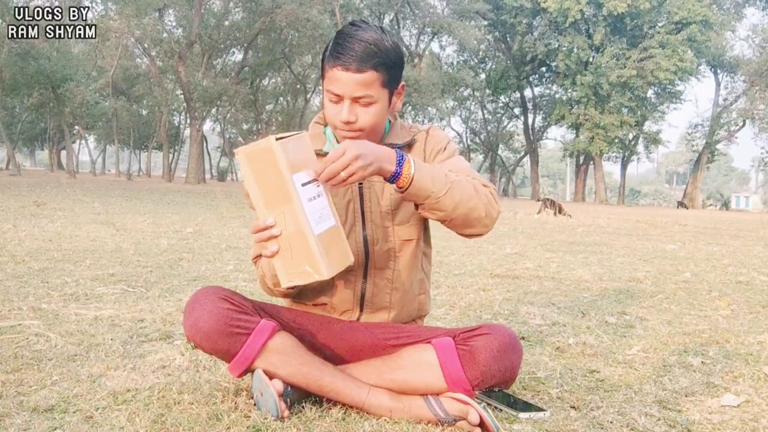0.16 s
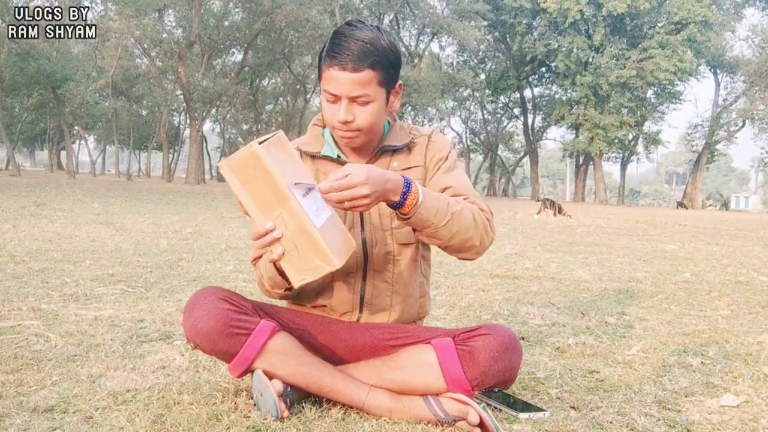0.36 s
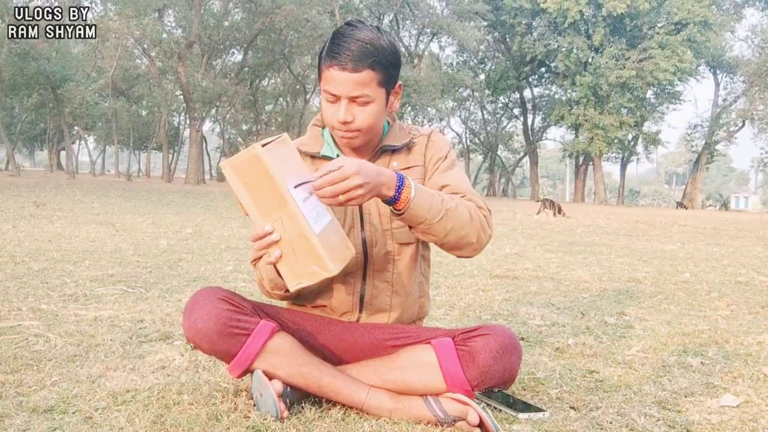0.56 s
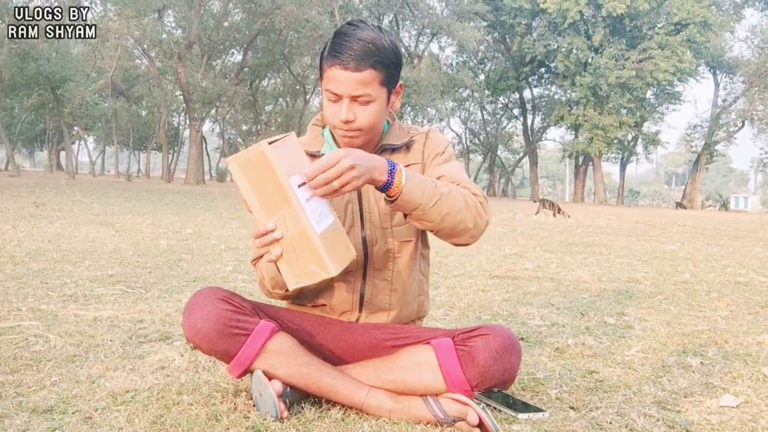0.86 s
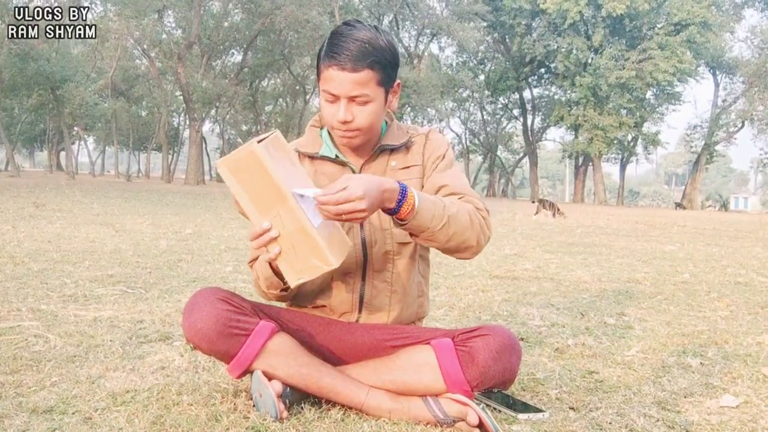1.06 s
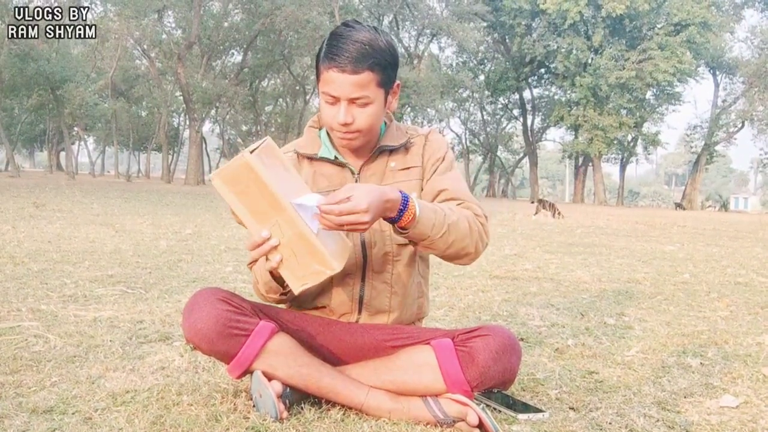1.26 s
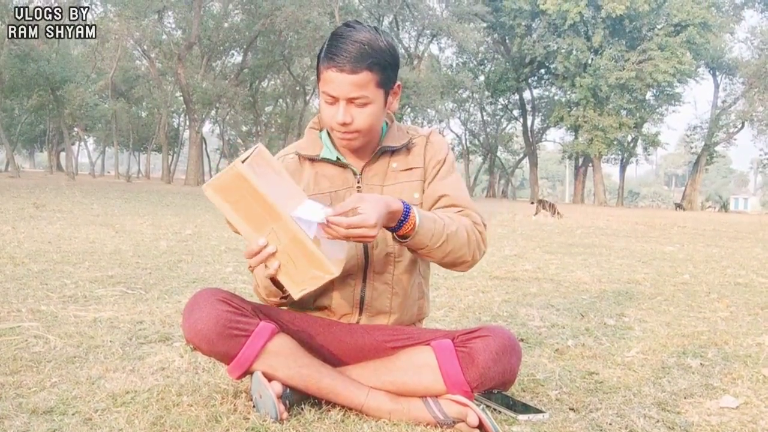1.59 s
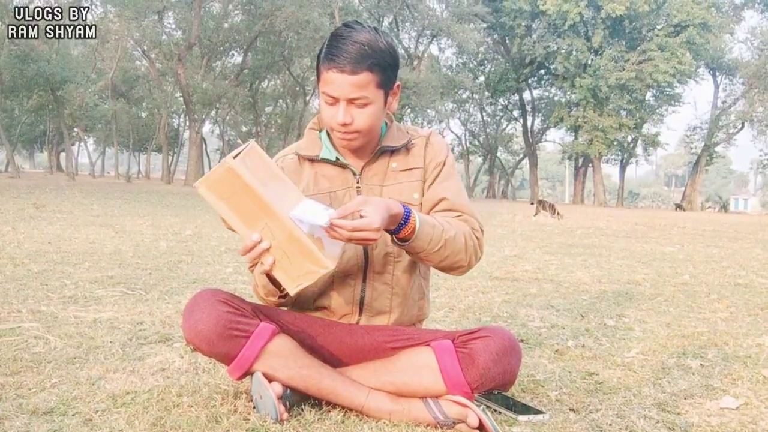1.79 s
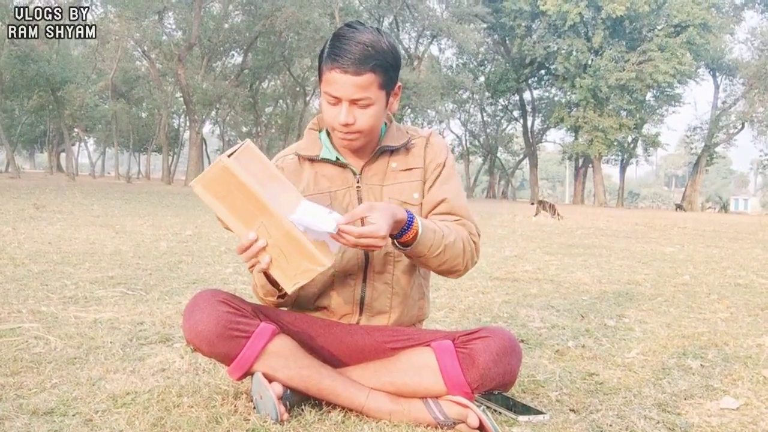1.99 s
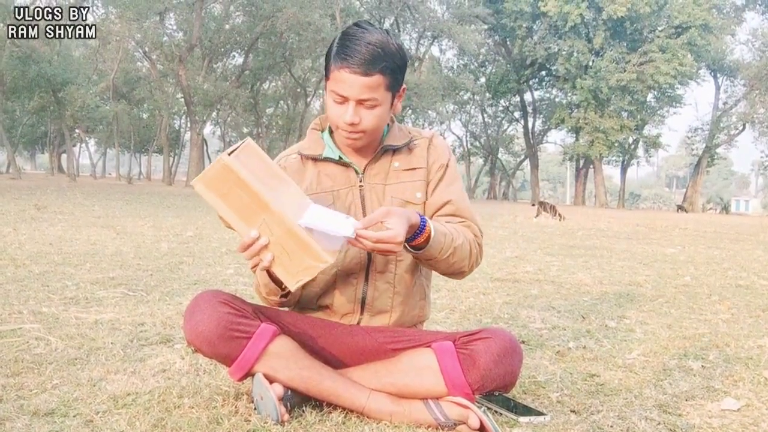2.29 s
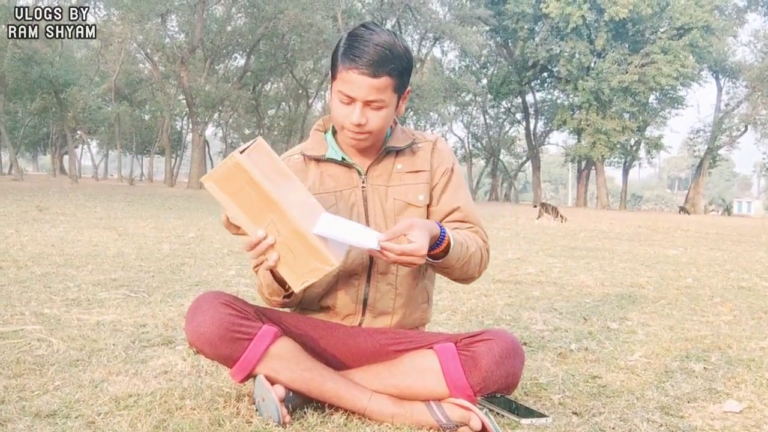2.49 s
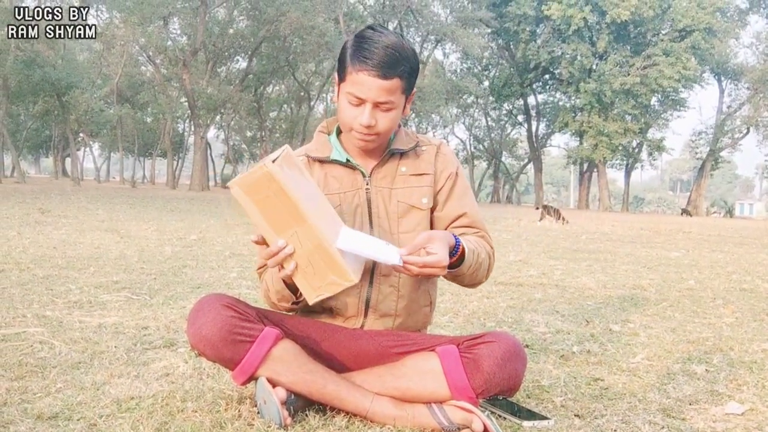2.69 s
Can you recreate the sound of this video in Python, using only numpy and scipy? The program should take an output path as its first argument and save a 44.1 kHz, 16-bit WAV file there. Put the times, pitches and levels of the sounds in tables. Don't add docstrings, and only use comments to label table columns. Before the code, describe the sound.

A sticky label peels off a hollow cardboard box: a loud fast rip first, then sparse slow crackles, then two quick rips and a slap, close in stereo outdoors over a faint low hum.

```python
import sys
import numpy as np
from scipy import signal
from scipy.fft import rfft, irfft, next_fast_len
from scipy.io import wavfile
from scipy.ndimage import uniform_filter1d, minimum_filter1d, map_coordinates

SR = 44100
rng = np.random.default_rng(int(sys.argv[2]) if len(sys.argv) > 2 else 0)


def makeup_ratio(level_db):
    decades = np.asarray(level_db, float) / 20
    return 10 ** decades


def output_pcm(signal):
    pcm = np.clip(np.atleast_2d(signal).T, -1, 1) * 32767
    wavfile.write(sys.argv[1], SR, np.round(pcm).astype(np.int16))


N = 125685

# (frequency [Hz], density [dB per Hz])
AIR_TONE = [(53, -16), (90, 2.5), (188, -6), (265, -9), (674, -14.5), (807, -17), (1600, -18),
            (2620, -14.5), (4500, -28.5), (5850, -53), (9900, -120)]
# (frequency [Hz], density [dB per Hz])
RUMBLE_TONE = [(28, -9), (40, 2), (60, -19), (80, -3.5), (100, -24)]
# (frequency [Hz], density [dB per Hz])
PORT_TONE = [(2650, -8.5), (4500, -5), (5700, 4), (6090, -5), (7640, 4.5), (9160, -11), (13000, -13),
             (14500, -11), (15000, -36)]
# (frequency [Hz], correlation [0-1])
AIR_ALIKE = [(60, 1), (130, 0.76), (500, 0.2), (1400, 0.033), (8000, .02)]
# (frequency [Hz], correlation [0-1])
NEAR_ALIKE = [(300, 0.92), (1200, 0.65), (3000, 0.5), (8000, 0.069)]
# (time [s], peel level [dB])
PULLS = [
    [(.233, -58), (.262, -29), (.288, -40.5), (.298, -32), (.324, -30), (.338, -41.5), (.385, -48),
     (.405, -61), (.47, -74)],
    [(.69, -54), (.72, -65.5), (.77, -64), (.8, -67), (.85, -62), (.88, -76)],
    [(1.02, -74), (1.05, -69.5), (1.08, -69.5), (1.11, -55.5), (1.16, -47), (1.2, -52.5), (1.26, -53),
     (1.28, -66), (1.33, -73)],
    [(1.48, -69), (1.52, -62), (1.57, -59.5), (1.61, -73), (1.66, -60.5), (1.72, -51), (1.755, -46),
     (1.785, -61.5), (1.832, -66)],
    [(1.826, -64), (1.86, -58.5), (1.88, -57), (1.94, -50.5), (1.96, -50.5), (2.0, -46), (2.03, -54),
     (2.07, -67)],
    [(2.085, -72), (2.135, -52.5), (2.16, -49.5), (2.18, -58), (2.24, -68.5)],
    [(2.236, -62), (2.322, -58), (2.34, -42.5), (2.365, -44), (2.4, -44), (2.42, -54.5), (2.445, -55.5),
     (2.484, -60.5)],
    [(2.48, -54), (2.525, -48), (2.54, -39), (2.56, -35.5), (2.59, -36), (2.6, -58), (2.66, -64)],
]
DRUM_DB = [-10.5, -17, 0, 0, -3, -7.5, -8, -13]
# (frequency [Hz], width [Hz], level [dB])
BOX_MODES = [(193, 37, -1), (348.6, 77.4, 1.5), (584, 87, -13), (928, 400, -8)]
# (time [s], peak [dB], body [dB])
FLAP_SNAPS = [(0.2336, -24, -12), (0.2356, -7, -17), (0.2375, -14.5, -10.5), (0.2443, -14, -1),
              (0.2544, -9, -10), (0.2594, -15, -11), (0.2609, -24, -9), (0.2633, -9, -4.5),
              (0.2649, -37, -17), (0.271, -10.5, -8), (0.281, -16, -11), (0.2842, -13, -4),
              (0.2928, -18, 6), (0.2978, -10.5, -9), (0.2997, -16, -2), (0.3027, -11, -9),
              (0.3042, -14, -8), (0.3073, -13, -14), (0.3095, -10, -11), (0.3125, -22, -11),
              (0.314, -11.5, -20), (0.3156, -24, -11), (0.3172, -13, -9), (0.3215, -8.5, -7.5),
              (0.3235, -24, -12), (0.3285, -29, -17), (0.3316, -22, -3), (0.3331, -23, -11)]
# (time [s], peak [dB], body [dB])
LABEL_SNAPS = [(0.696, -39, -14), (1.0415, -37, -16), (1.0595, -33.5, -23), (1.0798, -39, -13),
               (1.0963, -30, -6), (1.0981, -31.5, -1), (1.1133, -41, -6), (1.1409, -39, -7),
               (1.4988, -41, -10), (1.525, -30, 7.5), (1.7437, -30, -14), (1.7519, -15.5, -23),
               (1.7546, -29, -9), (1.7589, -23.5, -13), (1.7827, -35, -7), (1.8604, -53, -20),
               (1.8624, -30, -15), (1.8669, -36, -15), (1.8761, -48, -17), (1.8785, -35, -19),
               (1.908, -35, -14), (1.9644, -36, -17), (1.9659, -29, -20), (1.9849, -17, -10),
               (1.9976, -38, -11), (2.0091, -32, -16), (2.013, -33, -6), (2.046, -29, -18),
               (2.0887, -29, -10), (2.0909, -36, 0), (2.1003, -28, -10), (2.1022, -21.5, -2),
               (2.1036, -31, -13), (2.115, -20, -7), (2.1267, -35, 7.5), (2.1341, -22, -2.5),
               (2.2901, -19.5, -5), (2.2921, -29, -2), (2.309, -38, -15), (2.3107, -23, -9),
              (2.313, -35, -2), (2.324, -25, -6), (2.325, -34, -7), (2.3311, -22, -23),
              (2.3355, -15.5, -16), (2.3458, -18.5, -11), (2.352, -20, -23), (2.364, -32, -9),
              (2.3661, -12, -20), (2.3689, -18, -7), (2.379, -32, -15), (2.3794, -29, -5),
              (2.3947, -22, -10), (2.3963, -27, -16), (2.4033, -20, -16), (2.4055, -24, -22),
              (2.4106, -24, -11), (2.4123, -37, -15), (2.4243, -41, -14), (2.433, -24, -10),
              (2.441, -33, -16), (2.4848, -26, -24), (2.4854, -27, -16), (2.503, -21, -12),
              (2.504, -40, -9), (2.5161, -21, -7), (2.519, -30, -3), (2.5271, -28, -15), (2.5365, -18, -18),
              (2.539, -22, -18), (2.5421, -17, -20), (2.5494, -24, -32), (2.5558, -17, -22),
              (2.5574, -18, -16), (2.5596, -18.5, -12), (2.5634, -16, -6), (2.5682, -19, -9),
              (2.5691, -27, -13), (2.57, -35, -6), (2.584, -24, -3), (2.5857, -21, -17),
              (2.5875, -21.5, 0.5), (2.5919, -32, -14), (2.8005, -43, -10)]
# (frequency [Hz], density [dB per Hz])
FLAP_TONE = [(280, -24), (430, -7), (900, 2), (1600, -7.5), (4800, -3), (9500, -1.5), (14000, -9.5),
             (16000, -22)]
# (frequency [Hz], density [dB per Hz])
LABEL_TONE = [(400, -19), (1000, 0), (2200, -2), (3000, 1.5), (6500, 1.5), (10000, 0), (14000, -4),
              (16000, -3)]
# (frequency [Hz], gain [dB])
LEFT_PORT = [(4000, -1.5), (5200, 2.5), (6200, 7), (7000, 7.5), (7900, 12.5), (8500, 9.5), (9200, 1),
             (11000, -1.5)]
# (frequency [Hz], gain [dB])
FLAP_RIGHT = [(200, 8), (2000, -0.5)]
# (frequency [Hz], gain [dB])
LABEL_RIGHT = [(200, 6), (1500, -6.5), (4000, -10), (12000, -2)]
# (time [s], level [dB], upper rings [dB])
CLINKS = [
    (.478, -60, 0),
    (.763, -52, 0),
    (1.283, -53, 0),
    (2.152, -47, -14),
]
# (frequency [Hz], level [dB], t60 [s])
GLASS_MODES = [(5670, -11, .25), (9017, 0, .15), (9950, -6, .2), (13710, -10, .12)]
# (time [s], level [dB])
TAPS = [
    (1.301, -53),
    (1.524, -43),
    (1.838, -45),
    (2.044, -48.5),
    (2.578, -40),
    (2.587, -32.5),
]
# (frequency [Hz], density [dB per Hz])
TAP_TONE = [(300, -33), (800, 4), (1600, -1), (3200, -4), (6000, -20)]
# (frequency [Hz], gain [dB])
TREBLE_EDGE = [(14300, 0.5), (14700, -15), (16300, -19), (16600, -90)]
# (frequency [Hz], share of bands dropped [0-1])
HOLES = [(1000, 0), (2500, .07), (4000, .07), (5000, .01), (8500, .01), (9500, .16), (14000, .2)]

HUM_HZ, HUM_DRIFT_HZ, HUM_DB, HUM_SWAY_DB = 58.3, 1.2, -46, 1.1
AIR_DB, PORT_DB, RUMBLE_DB = -63.5, -63, -58
GRAINS_PER_S, GRAIN_SPREAD_DB, GRAIN_T60_S, HISS_SHARE = 700, 4, .005, .65
PEEL_DB, PULL_EDGE_S = 5, .0025
HISS_TOP_HZ = 14600
SNAP_DB, SNAP_T60_S, SNAP_RISE_S = -10, .0055, .0002
SNAP_TAIL_DB, SNAP_TAIL_T60_S = -12, .022
SPIKE_DB, RING_UP_S = 13.5, .00025
SOFT_BELOW_DB, SOFTEN = -28, .45
BODY_HZ, BODY_DB = 3250, 9
DULL_CRACK_DB, DULL_TAIL_DB = -5, 3
FLEX_DB = 3
THUMP_DB = -34
TAP_T60_S = 0.018
GROUND_T60_S, GROUND_DB = 0.028, -18
LEAD_S = 5e-5
HEADROOM = .8
TOP_GATE_DB = 5.5


def unit(x):
    return x / np.sqrt(np.mean(x ** 2) + 1e-20)


def along(points, hz):
    f, v = np.transpose(points)
    return np.interp(np.log(hz + 1), np.log(f + 1), v)


def wobble(rate_hz):
    knots = rng.standard_normal(int(N * rate_hz / SR) + 4)
    return map_coordinates(knots, [np.arange(N) * rate_hz / SR])


def filtered(x, transfer):
    m = next_fast_len(N + 8192)
    return irfft(rfft(x, m) * transfer(np.fft.rfftfreq(m, 1 / SR)), m)[..., :N]


def fading(t60_s, length_s=.08):
    return makeup_ratio(-60 * np.arange(int(length_s * SR)) / SR / t60_s)


def response(points):
    c = irfft(np.log(makeup_ratio(along(points, np.fft.rfftfreq(4096, 1 / SR))) + 1e-6))
    c[1:2048] *= 2
    c[2049:] = 0
    return irfft(np.exp(rfft(c)))


def rush(points, alike):
    def gain(hz):
        turn = np.arccos(np.clip(along(alike, hz), -1, 1)) / 2
        return makeup_ratio(along(points, hz)) * (hz > 15) * [np.cos(turn), np.sin(turn)]

    mid, side = filtered(rng.standard_normal((2, N)), gain)
    return unit(np.array([mid + side, mid - side]))


def field():
    turns = np.cumsum(HUM_HZ + HUM_DRIFT_HZ * wobble(5.6)) / SR
    phase = 2 * np.pi * turns + np.array([[.13], [-.13]])
    hum = np.sqrt(2) * makeup_ratio(HUM_DB + HUM_SWAY_DB * wobble(14)) * np.sin(phase)
    rumble = makeup_ratio(RUMBLE_DB) * rush(RUMBLE_TONE + [(150, -52)], AIR_ALIKE)
    air = makeup_ratio(AIR_DB + 0.14 * wobble(4.0)) * rush(AIR_TONE, AIR_ALIKE)
    hiss = makeup_ratio(PORT_DB + 0.77 * wobble(7.5)) * rush(PORT_TONE + [(15500, -90)], AIR_ALIKE)
    return hum + rumble + air + hiss


def peel():
    t, level, drum = np.arange(N) / SR, np.zeros(N), np.zeros(N)
    for rows, box_db in zip(PULLS, DRUM_DB):
        s, db = np.transpose(rows)
        edges = np.clip(np.minimum(t - s[0], s[-1] - t) / PULL_EDGE_S, 0, 1)
        pull = edges * makeup_ratio(np.interp(t, s, db))
        level += pull * makeup_ratio(PEEL_DB)
        drum += pull * makeup_ratio(box_db)
    sizes = makeup_ratio(GRAIN_SPREAD_DB * rng.exponential(size=N).clip(0, 3))
    slips = (rng.random(N) < GRAINS_PER_S / SR) * sizes
    bursts = unit(signal.fftconvolve(slips, fading(GRAIN_T60_S))[:N])
    grains = np.sqrt((1 - HISS_SHARE) * bursts ** 2 + HISS_SHARE) * makeup_ratio(1.28 * wobble(60))
    grains = grains * rush([(100, 0), (HISS_TOP_HZ, 0), (15000, -40)], NEAR_ALIKE)
    return grains * level, box(grains * makeup_ratio(1.7 * wobble(29.78)) * drum)


def box(x):
    def walls(f):
        total = 0
        for k, (centre, width, db) in enumerate(BOX_MODES):
            loss = 1j * f * width
            total = total + (-1) ** k * makeup_ratio(db) * loss / (centre ** 2 - f * f + loss)
        return total

    gain = np.sqrt(np.mean(np.abs(walls(np.linspace(0, SR / 2, 4000))) ** 2))
    return filtered(x, walls) / gain


def snaps(rows):
    s, db, body_db = np.transpose(rows)
    kick = np.zeros((2, N))
    kick[:, np.round((s - RING_UP_S) * SR).astype(int)] = makeup_ratio([db, db + body_db + BODY_DB])
    decay = fading(SNAP_T60_S) + makeup_ratio(SNAP_TAIL_DB) * fading(SNAP_TAIL_T60_S)
    shape = makeup_ratio(SNAP_DB) * decay * (1 - fading(np.log(1000) * SNAP_RISE_S))
    tail = signal.fftconvolve(kick, shape[None], axes=1)[:, None, :N]
    tail = tail * rush([(100, 0), (HISS_TOP_HZ, 0), (15000, -20)], NEAR_ALIKE)
    crack = kick * np.minimum(1, kick[0] / makeup_ratio(SOFT_BELOW_DB)) ** SOFTEN
    crack = makeup_ratio(SPIKE_DB) * (crack * makeup_ratio([[0], [DULL_CRACK_DB]]))[:, None]
    bright, dull = tail * makeup_ratio([[[0]], [[DULL_TAIL_DB]]]) - crack

    def low(hz):
        return 1 / (1 + 1j * hz / BODY_HZ) ** 2

    return filtered(dull, low) + filtered(bright, lambda hz: 1 - low(hz))


def flexed(x):
    z = signal.stft(x, nperseg=128)[2]
    bend = uniform_filter1d(rng.standard_normal(z.shape[1:]), size=2, axis=0)
    bend = uniform_filter1d(bend, size=8, axis=1)
    gain = unit(makeup_ratio(FLEX_DB * unit(bend)))
    return signal.istft(z * gain, nperseg=128)[1][:, :N]


def coloured(x, tone, right_port):
    h = [np.convolve(response(tone), response(port))[:4096] for port in (LEFT_PORT, right_port)]
    return signal.fftconvolve(x, h / np.linalg.norm(h[0]), axes=1)[:, :N]


def bangles():
    out, t = np.zeros(N + SR), np.arange(SR // 2) / SR
    for s, db, upper_db in CLINKS:
        ring = np.zeros(len(t))
        for hz, level_db, t60_s in GLASS_MODES:
            mode_db = level_db + upper_db * (hz > GLASS_MODES[1][0]) + rng.normal(0, 0.43)
            ring += makeup_ratio(mode_db - 60 * t / t60_s) * np.sin(2 * np.pi * hz * t)
        ring *= 1 - makeup_ratio(-60 * t / 0.0014)
        tick = 1.9 * makeup_ratio(-60 * t / 0.011) * rng.standard_normal(len(t))
        out[round(s * SR):][:len(t)] += makeup_ratio(db) * (ring + tick)
    return out[:N] * makeup_ratio([[1.5], [-1.5]])


def taps():
    kick = np.zeros(N)
    s, db = np.transpose(TAPS)
    kick[np.round(s * SR).astype(int)] = makeup_ratio(db)
    h = response(TAP_TONE)
    burst = signal.fftconvolve(kick, fading(TAP_T60_S))[:N] * rush([(100, 0)], NEAR_ALIKE)
    return signal.fftconvolve(burst, h[None] / np.linalg.norm(h), axes=1)[:, :N]


def ground(x):
    tail = rng.standard_normal((2, int(.08 * SR))) * fading(GROUND_T60_S)
    return signal.fftconvolve(x, tail / np.linalg.norm(tail[0]), axes=1)[:, :N]


def scene():
    paper, drum = peel()
    on_flap = np.arange(N) / SR < PULLS[1][0][0] - .1
    label_snaps = snaps(LABEL_SNAPS)
    flap = coloured(flexed(snaps(FLAP_SNAPS) + paper * on_flap), FLAP_TONE, FLAP_RIGHT)
    label = coloured(flexed(label_snaps + paper * ~on_flap), LABEL_TONE, LABEL_RIGHT)
    near = flap + label + drum + makeup_ratio(THUMP_DB) * box(label_snaps) + taps()
    near = near + makeup_ratio(GROUND_DB) * ground(near)
    near = filtered(near, lambda hz: np.exp(1j * np.pi * LEAD_S * np.outer([1, -1], hz)))
    return near + bangles() + field()


def top_gate(x):
    top = filtered(x, lambda hz: hz > HISS_TOP_HZ)
    power = np.mean(top ** 2, axis=0)
    usual = np.abs(uniform_filter1d(power, size=900))
    sudden = uniform_filter1d(power, size=130) > makeup_ratio(2 * TOP_GATE_DB) * usual + 3e-8
    held = 1 - minimum_filter1d(1. - sudden, size=200)
    return x - top * (1 - uniform_filter1d(held, size=120))


def gaps(x):
    hz, t, z = signal.stft(x, SR, nperseg=1024)
    luck = rng.random((len(hz) // 7 + 1, len(t) // 4 + 1))
    luck = luck.repeat(7, axis=0).repeat(4, axis=1)[:len(hz), :len(t)]
    kept = luck > along(HOLES, hz)[:, None]
    return signal.istft(z * kept, SR, nperseg=1024)[1][:, :N]


def roll_off(x):
    return signal.sosfilt(signal.butter(12, 16600, fs=SR, output="sos"), x)


def record(dry):
    x = filtered(dry, lambda hz: makeup_ratio(along(TREBLE_EDGE, hz)))
    x = x / (1 + np.abs(x / HEADROOM) ** 6) ** (1 / 6)
    mix = gaps(top_gate(x))
    return roll_off(mix)


dry = scene()
out = record(dry)
output_pcm(out)
```